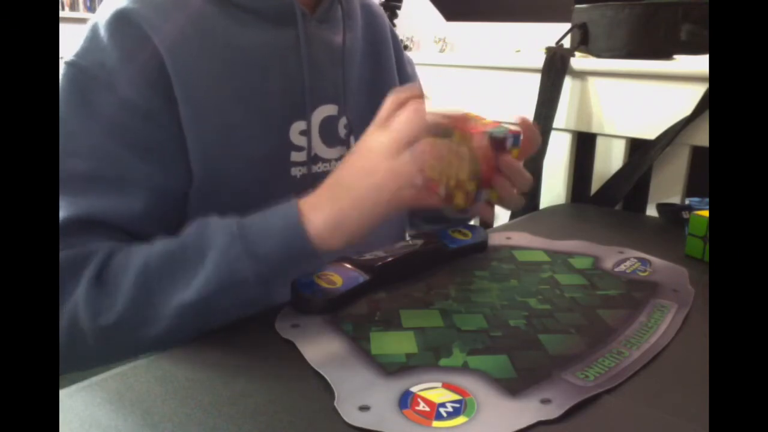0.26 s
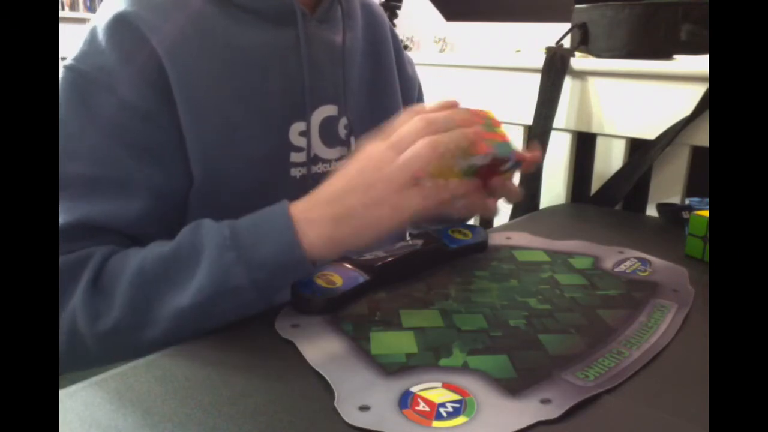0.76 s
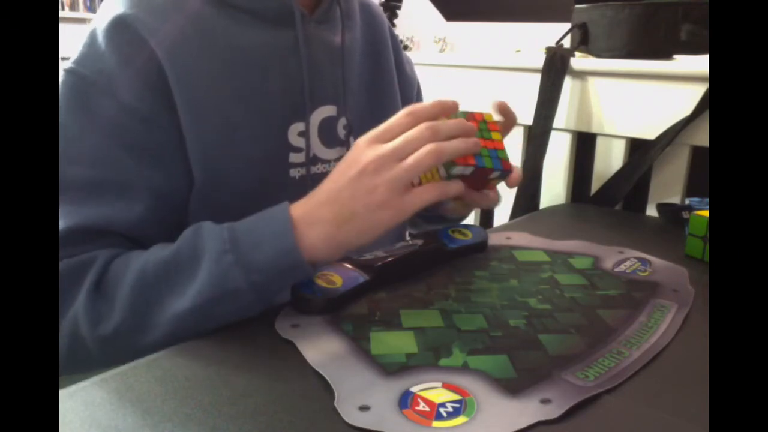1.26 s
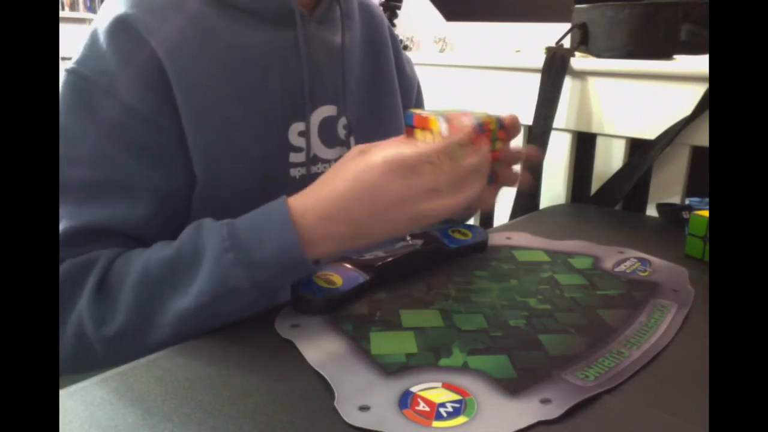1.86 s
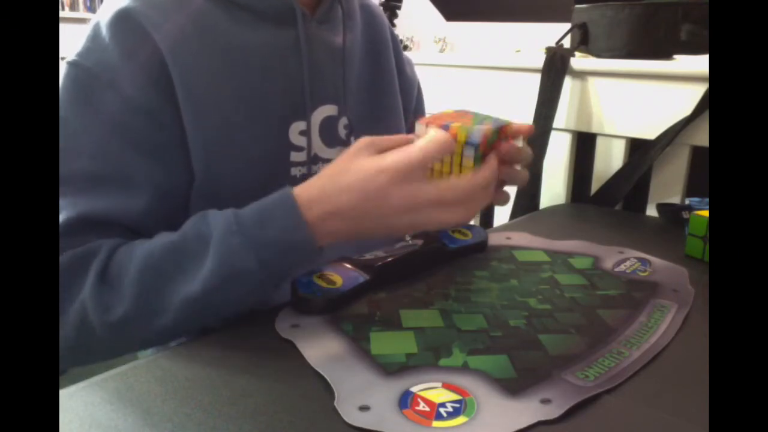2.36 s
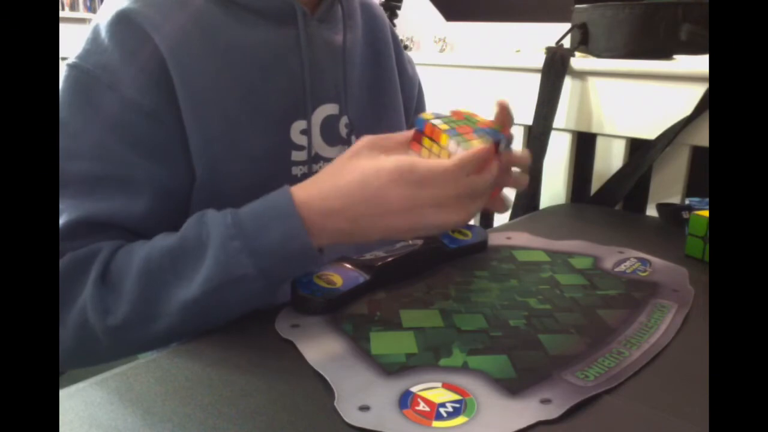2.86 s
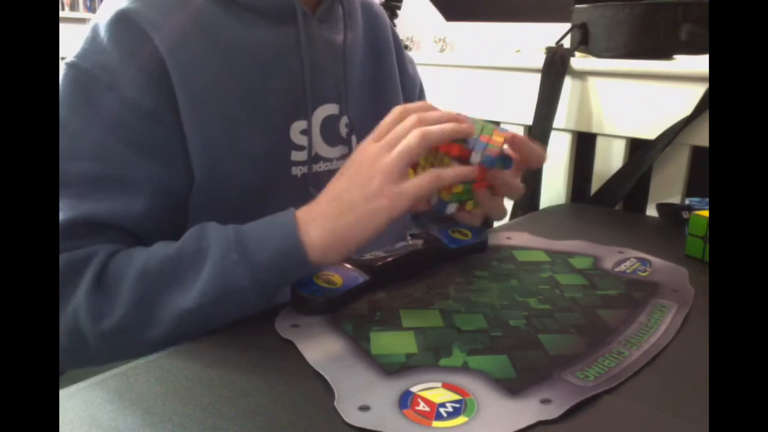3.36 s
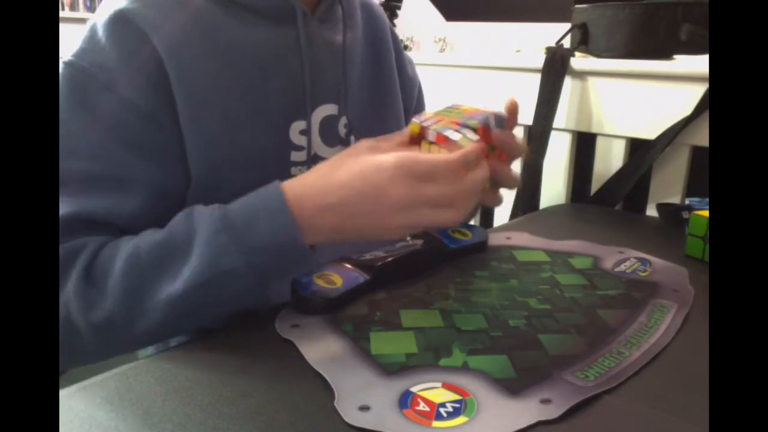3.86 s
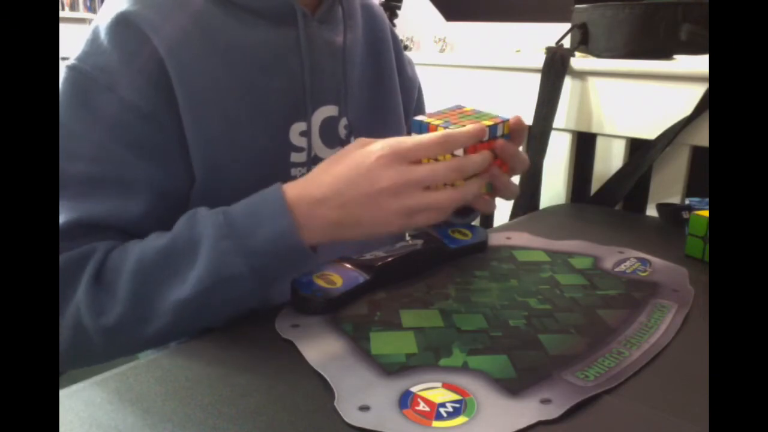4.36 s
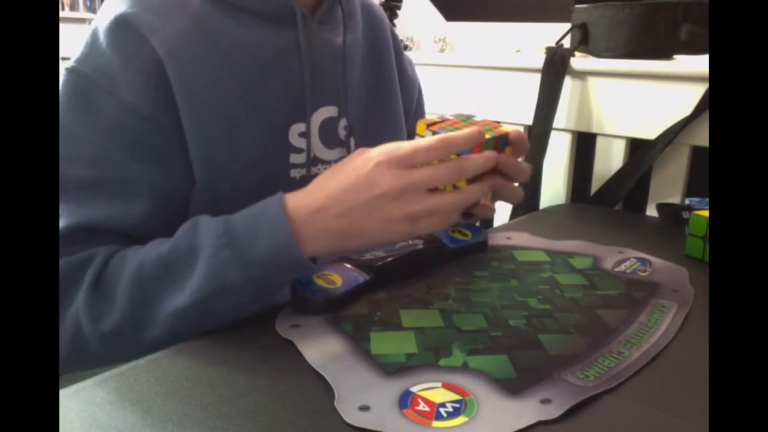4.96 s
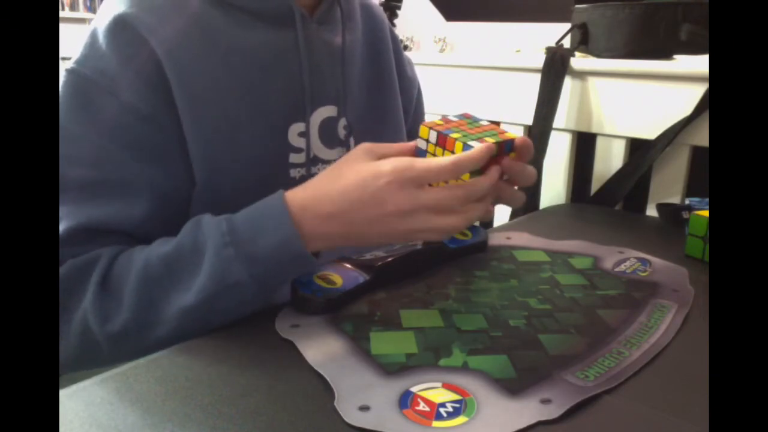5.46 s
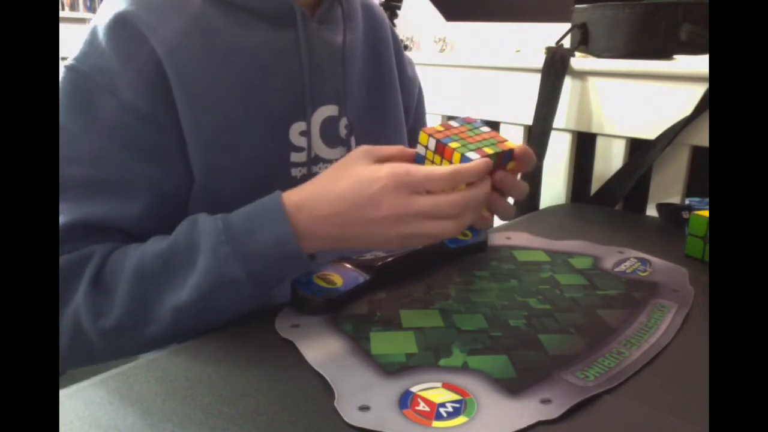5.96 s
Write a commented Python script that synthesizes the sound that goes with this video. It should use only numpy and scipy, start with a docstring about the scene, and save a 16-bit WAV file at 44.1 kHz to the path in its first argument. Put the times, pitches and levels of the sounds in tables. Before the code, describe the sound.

Close in a small quiet room, a plastic puzzle cube is turned very fast. A loud clattering burst of snaps opens, then a soft sleeve drag and a pause. A brief burst follows, then dense clusters of clicks with dull desk bumps and a small hollow knock. One last burst gives way to faint finger ticks and room noise.

```python
"""A plastic puzzle cube is turned fast by hand at a desk in a small quiet room, for about six seconds.
It opens with a strong burst of snaps over a rattle of small contacts, then an arm drags over the mat.
A short burst comes at 1.3 s and denser ones from 2.1 to 4 s, with bumps on the desk; at 3.8 s a hollow
thing is knocked and rocks. A last burst at 4.7 s and faint finger shifts leave room noise and mains hum.
Contacts are tiny noise flurries sent through damped modes; the desk and walls throw the sound back."""
import sys
import numpy as np
from scipy import signal
from scipy.fft import rfft, irfft
from scipy.io import wavfile
from scipy.ndimage import uniform_filter1d

SR = 44100
rng = np.random.default_rng(int(sys.argv[2]) if len(sys.argv) > 2 else 0)


def persist_wave(psi):
    """Save psi, clipped to +-1, as 16-bit WAV."""
    counts = np.round(np.clip(psi, -1, 1) * 32767).astype(np.int16)
    wavfile.write(sys.argv[1], SR, np.atleast_2d(counts).T)


N = 274302
HZ = np.fft.rfftfreq(2048, 1 / SR)  # the frequencies of every 2048-sample spectrum

# Damped modes of the cube's hollow body. Each row: pitch in Hz, width in Hz, relative level in dB.
BODY_MODES = [(630, 270, 2), (816, 490, 3), (1104, 350, -0.5), (1420, 540, -1.5), (1843, 910, 0.5)]
# The microphone's treble colour, put on the sharp edges. Each row: frequency in Hz, gain in dB.
MIC_COLOUR = [(6500, 3), (8200, -7.5), (9600, 2.5), (11200, 0.5), (12500, -9.5), (13900, 0), (15500, -11.5)]
# Turns of a layer. Each row: start of full force in seconds, time held in seconds, rattle level in dB,
# hollow body against it in dB, sharp edge against it in dB.
LAYER_TURNS = [(.04, .055, -28.5, -10, -4), (0.121, 0.052, -19.5, -9.5, -7.5), (1.298, 0.094, -36, -14, -6),
               (2.127, 0.012, -36.5, -22, -10.5), (2.145, 0.022, -28, -25.5, -9),
               (2.246, 0.056, -33, -8.5, -3), (2.388, 0.023, -30, -14, -7), (2.71, 0.016, -42, -13.5, -10),
               (2.738, 0.027, -23.5, -27, -4), (2.815, .03, -41.5, -8.5, -14),
               (2.864, 0.024, -30.5, -28, -2), (2.895, 0.017, -22, -11, -3),
               (3.232, 0.018, -34.5, -5.5, -6), (3.389, .025, -37.5, -16, -12),
               (3.526, .015, -42, -13, -17.5), (3.545, .03, -29.5, -15.5, -7.5),
               (3.7, 0.023, -41.5, -17, -13), (3.795, 0.012, -30, -32, -3),
               (3.875, 0.0068, -29.5, -17.5, -5.5), (3.893, 0.015, -24.5, -16, -0.5),
               (3.965, 0.012, -26.5, -9.5, -8.5), (4.662, 0.051, -33, -8.5, -7)]
TURN_RISE_DB_PER_S, TURN_FALL_DB_PER_S = 1500.5, 401.5


def gain_of(db):
    """Turns decibels into a factor."""
    return 10 ** (np.asarray(db) / 20)


def evened(x):
    """Scales a sound to rms 1."""
    return x / np.sqrt(np.mean(x ** 2) + 1e-20)


def read(points, hz):
    """Reads a curve of (Hz, value) points on a log-frequency axis."""
    f, value = np.transpose(points)
    return np.interp(np.log(hz + 1), np.log(f + 1), value)


def add(mix, s, sound):
    """Mixes a sound in at a time in seconds."""
    part = mix[round(s * SR):][:len(sound)]
    part += sound[:len(part)]


def swell(t, start, hold, db, rise, fall):
    """Level in dB that climbs, holds and sinks at steady rates (dB per s)."""
    before = np.maximum(start - t, 0)
    after = np.maximum(t - start - hold, 0)
    return db - rise * before - fall * after


def mode(hz, width):
    """Spectrum of one damped mode, gain 1 at its centre; a wider mode dies sooner."""
    return 1j * HZ * width / (hz ** 2 - HZ ** 2 + 1j * HZ * width)


def modes(table, lowest_hz=500):
    """Spectrum of a set of modes; a small body sends out little below its lowest mode."""
    small = (1j * HZ / lowest_hz / (1 + 1j * HZ / lowest_hz)) ** 4
    return small * sum(gain_of(db) * mode(hz, width) ** 2 for hz, width, db in table)


def nearby(count):
    """Rows of spectra: the direct sound plus echoes off hands, desk and chest, drawn anew for each row."""
    # Each row: shortest delay in seconds, longest delay in seconds, echo level in dB.
    near_echoes = [(.0006, .0015, -8), (.0016, .0028, -11), (.003, .005, -16), (.005, .008, -21)]
    short, long, db = np.array(near_echoes).T
    delay = short + (long - short) * rng.random((count, len(db)))
    echoes = gain_of(db)[:, None] * np.exp(-2j * np.pi * HZ * delay[..., None])
    return 1 + echoes.sum(axis=1)


def chatter(count, rise, t60):
    """A contact is a quick flurry of tiny blows, heard with its near echoes (rows of spectra)."""
    t = np.arange(500) / SR
    envelope = (1 - np.exp(-t / rise)) ** 2 * gain_of(-60 * t / t60)
    flurry = rng.standard_normal((count, len(t))) * envelope
    return rfft(flurry, 2048) * nearby(count)


def strike(colour, blows):
    """Sends rows of contact spectra through a colour; rms 1 over the first 2.5 ms."""
    sound = irfft(blows * colour)[:, :1200]
    return sound / np.sqrt(np.mean(sound[:, :110] ** 2, axis=1, keepdims=True))


def clicks(rows, edge_width_hz=4400):
    """Each snap sounds the piece, the hollow body and the sharp edge in its own shares."""
    s, db, body_db, edge_db, hz = np.array(rows).T[..., None]
    # the body and edge shares set how wide the piece's modes spread (Hz, then Hz per dB of each share)
    spread = np.maximum(2900 + 39 * body_db + 53 * edge_db, 500)
    # the edge has one pitch, a little off at each snap
    edge_hz = 10730 * np.exp(0.045 * rng.standard_normal(s.shape))
    blows = chatter(count=len(s), rise=.0003, t60=.0034)

    neighbours = gain_of(-24.0) * mode(2000, 1200) ** 2
    piece = strike(mode(hz, 1.5 * spread) ** 3 + neighbours, blows)
    body = strike(modes(BODY_MODES), blows)
    edge = strike(mode(edge_hz, edge_width_hz) ** 3 * gain_of(read(MIC_COLOUR, HZ)), blows)
    sound = piece + gain_of(body_db) * body + gain_of(edge_db) * edge

    out = np.zeros(N)
    for at, one in zip(s[:, 0], gain_of(db) * sound):
        add(out, at, one)
    return out


def small_ticks(pitch_off=0.08, share_off_db=5.0):
    """Rows like the snaps, drawn by chance: ten follow the force of each turn, nine fall in each regrip."""
    # Fingers regrip and the pieces shift faintly. Each row: start in seconds, length in seconds, level in dB.
    finger_shifts = [(2.517, .18, -55.5), (2.992, 0.17, -55.5), (3.101, 0.1, -51.5), (3.308, 0.067, -62),
                     (4.759, .16, -60), (5.071, 0.066, -63.5)]
    tick_db, tick_spread_db, lead_s, trail_s = -1.4, 3, .008, .05
    loose_body_db, loose_edge_db, loose_hz, regrip_dull_db = -9, -8, 3900, -8

    start, hold, db = np.array(LAYER_TURNS).T[:3, :, None]
    t = start - lead_s + (lead_s + hold + trail_s) * rng.random((len(LAYER_TURNS), 10))
    level = swell(t, start, hold, db + tick_db, TURN_RISE_DB_PER_S, TURN_FALL_DB_PER_S)

    start, length, db = np.array(finger_shifts).T[..., None]
    shift = start + length * rng.random((len(finger_shifts), 9))
    edge_db = loose_edge_db + np.append(0 * t, regrip_dull_db + 0 * shift)  # regrips are duller

    t, level = np.append(t, shift), np.append(level, db + 0 * shift)
    a, b, c, d = rng.standard_normal((len(t), 4)).T
    return np.transpose([np.maximum(t, 0),
                         level + tick_spread_db * a,
                         loose_body_db + share_off_db * b,
                         edge_db + share_off_db * c,
                         loose_hz * np.exp(pitch_off * d)])


def rattle(per_s=1200, spread_db=3.5, pitch_hz=3700, width_hz=3200, edge_hz=10500, edge_width_hz=6000,
           detune=0.37):
    """Many small contacts of uneven size on two dozen pieces, under the force of the turn."""
    t = np.arange(N) / SR
    force = np.zeros((3, N))  # for the pieces, the body and the edges
    for start, hold, db, body_db, edge_db in LAYER_TURNS:
        level = gain_of(swell(t, start, hold, db, TURN_RISE_DB_PER_S, TURN_FALL_DB_PER_S))
        force = np.maximum(force, level * gain_of([[0], [body_db], [edge_db]]))

    size = gain_of(spread_db * np.minimum(rng.exponential(1, N), 4))
    size = size * (rng.random(N) < per_s / SR)  # contacts fall at random moments
    piece = rng.integers(0, 24, N)
    blows = chatter(count=24, rise=.0002, t60=.002)
    pitch = pitch_hz * np.exp(detune * rng.standard_normal((24, 1)))
    edge = mode(edge_hz * np.sqrt(pitch / pitch_hz), edge_width_hz) ** 2 * gain_of(read(MIC_COLOUR, HZ))

    out = np.zeros(N)
    for colour, level in zip((mode(pitch, width_hz) ** 2, modes(BODY_MODES), edge), force):
        hits = np.zeros(N)
        for k, one in enumerate(strike(colour, blows)):
            hits += signal.oaconvolve(size * (piece == k), one)[:N]
        out += uniform_filter1d(level, size=130) * evened(hits)
    return out


def thumps():
    """A palm or wrist bumps the desk: a low dull push, a fading sine with a soft start."""
    # Each row: start in seconds, level in dB before the soft start, pitch in Hz, time to fade 60 dB in seconds.
    desk_bumps = [(0.144, -36.5, 380, 0.084), (2.747, -38, 264, 0.063), (3.566, -38, 268, 0.045),
                  (3.8276, -21.5, 199, 0.016)]
    out, t = np.zeros(N), np.arange(6000) / SR
    for s, db, hz, t60 in desk_bumps:
        soft_start = (1 - np.exp(-t / .002)) ** 2
        add(out, s, gain_of(db - 60 * t / t60) * soft_start * np.sin(2 * np.pi * hz * t))
    return out


def nudges():
    """A hollow thing on the desk is knocked, then rocks to rest, ringing the same modes at each nudge."""
    # Each row: pitch in Hz, relative level in dB, time to fade 60 dB in seconds.
    hollow_modes = [(650, 0, .09), (790, 0, .09), (890, -4, .07), (1740, -4, .05), (2170, -4, .045),
                    (2235, 0, .07), (2310, -4, .045)]
    knock, rock = (3.826, -56, -35), (3.92, -41, -43)  # start in s, low modes in dB, high modes in dB
    gap_s, steady_s, low_fall_db_per_s, high_fall_db_per_s = .0175, .13, 200, 55

    out, t = np.zeros(N), np.arange(6000) / SR
    hz, db, t60 = np.array(hollow_modes).T[..., None]
    late = gap_s * (np.arange(11) + rng.uniform(-.2, .2, 11))  # uneven rocking
    rocks = np.transpose([rock[0] + late,
                          swell(late, 0, steady_s, rock[1], 0, low_fall_db_per_s),
                          rock[2] - high_fall_db_per_s * late])
    soft_start = 1 - np.exp(-t / 0.00065)
    for (s, low_db, high_db), (phase, off) in zip([knock, *rocks], rng.random((12, 2, len(hz), 1))):
        level = gain_of(np.where(hz < 1200, low_db, high_db) + db - 60 * t / t60)
        pitch = hz * (1 + 0.027 * (off - .5))  # a little off at each nudge
        ringing = level * np.sin(2 * np.pi * pitch * t + phase)
        add(out, s, ringing.sum(axis=0) * soft_start)
    return out


def drag(per_s=400):
    """A forearm drags lightly over the desk mat: cloth catches and slips in small uneven jerks."""
    # Each row: start in seconds, time held in seconds, level in dB.
    arm_drags = [(.33, .01, -55.5), (.56, .25, -67), (1.55, 0.052, -72), (4.12, 0.065, -61.5)]
    # What the drag sounds through. Each row: pitch in Hz, width in Hz, relative level in dB.
    mat_modes = [(584, 130, 1), (840, 110, 0.5), (1660, 140, -8.5), (2270, 220, -7.5)]
    rise_db_per_s, fall_db_per_s = 300, 166

    slips = rng.standard_normal(N) * rng.exponential(1, N) * (rng.random(N) < per_s / SR)
    t = np.arange(N) / SR
    level = sum(gain_of(swell(t, *row, rise_db_per_s, fall_db_per_s)) for row in arm_drags)
    return level * evened(signal.oaconvolve(slips, irfft(modes(mat_modes)))[:N])


def room(x):
    """The walls answer after a gap with a noise tail, each band dying at its own speed."""
    # Each row: frequency in Hz, time to fade 60 dB in seconds.
    wall_fades = [(300, 0.15), (800, 0.12), (2100, 0.13), (5500, 0.16), (12000, 0.11)]
    room_db, late_db, late_t60 = -13.5, -29.5, 0.4  # whole tail; start of the slow part before scaling; s

    hz, t, z = signal.stft(rng.standard_normal(SR), SR, nperseg=256)
    fade = gain_of(-60 * t / read(wall_fades, hz)[:, None])
    # the house beyond: slower and duller
    fade = fade + gain_of(late_db - 60 * t / late_t60) / (1 + (hz[:, None] / 2500) ** 2)
    tail = signal.istft(z * fade, SR, nperseg=256)[1][:SR]
    tail *= np.clip((np.arange(SR) / SR - .005) / .016, 0, 1)  # silent for 5 ms, then fades in over 16 ms
    tail *= gain_of(room_db) / np.linalg.norm(tail)
    return x + signal.fftconvolve(x, tail)[:N]


def background():
    """Room noise with soft patches in time and pitch, and hum lines that waver in level."""
    # Colour of the room noise. Each row: frequency in Hz, relative level in dB per Hz.
    air_colour = [(18, -48.5), (30, -18.5), (125, 0.5), (242, -1), (443, -9), (835, -6), (1210, -12.5),
                  (1890, -9), (2050, -12.5), (5160, -18.5), (8760, -20.5), (10300, -19), (11700, -26.5),
                  (13700, -26.5), (16500, -61.5)]
    # Each row: pitch in Hz, level in dB rms at the end of the scene.
    hum_lines = [(118.4, -76.5), (807.5, -81.5), (1922, -79.5), (2762, -89), (2880, -84), (2998, -99.5)]
    # The background rises after bursts and sinks in pauses. Each row: time in seconds, noise level in dB.
    noise_level = [(0, -54), (.3, -57), (.66, -58), (0.848, -60), (1.1, -64), (1.3, -62.5), (1.45, -56.5),
                   (1.85, -60.5), (2.15, -56.5), (2.5, -55.5), (3.0, -56), (3.6, -55.5), (4.15, -54.5),
                   (4.45, -59), (5.06, -57.5), (5.472, -63.5), (6.22, -64)]

    frames, t = N // 512 + 5, np.arange(N) / SR
    a, b, patches = rng.standard_normal((frames, 1025, 3)).T
    patches = uniform_filter1d(patches, size=20, axis=0)  # smooth in pitch
    patches = evened(uniform_filter1d(patches, size=8, axis=1))  # smooth in time
    z = (a + 1j * b) * gain_of(read(air_colour, HZ)[:, None] + 0.72 * patches)
    air = evened(signal.istft(z, nperseg=2048, noverlap=1536)[1][:N])

    s, db = np.transpose(noise_level)
    level = gain_of(np.interp(t, s, db))
    hum = np.zeros(N)
    for f, d in hum_lines:
        waver = evened(uniform_filter1d(rng.standard_normal(N), size=4000))
        hum += gain_of(d + 0.58 * waver) * np.sqrt(2) * np.sin(2 * np.pi * f * t)
    return level * (air + hum / level[-1])  # the hum follows the noise level too


def scene():
    """The cube and the desk sounds in the room, over the background."""
    # The clearest snaps. Each row: start in seconds, level of the piece in dB rms over its first 2.5 ms,
    # hollow body against it in dB, sharp edge against it in dB, pitch of the piece in Hz.
    clear_snaps = [(.0104, -37.5, -15, -12.5, 4300), (.0362, -40, -12, -1, 3780),
                   (.0458, -31, -8, 0.5, 3600), (.0539, -18, -8.5, -8, 4040), (.0646, -22, -4, -5.5, 4040),
                   (.073, -30, -6, -2, 4000), (.0824, -23, -12.5, 6.5, 4700), (.0918, -31, -21, 4, 5100),
                   (.1144, -23, -8, -7, 3230), (.1223, -17, -8, -13, 2800), (.1319, -17.5, 2.5, -1, 3470),
                   (.1387, -11.5, -11, -6, 3900), (.1515, -18.5, -11, 2.5, 4170),
                   (.1609, -16, -9, -9, 5100), (.17, -31, -10, -11.5, 3540), (.1778, -13, -1, -10, 3360),
                   (.1862, -33, -15.5, -10, 3430), (.202, -18.5, -15, -14.5, 3980),
                   (.2056, -26.5, 0.5, -8.5, 3300), (.3601, -48.5, -13, -15, 3500),
                   (.7683, -44.5, -17, -23, 3630), (1.2953, -35, -23, -4, 4100),
                   (1.3072, -35, -13, 1, 4570), (1.3117, -29.5, -22.5, -2, 3600),
                   (1.3274, -28, -16, -14.5, 3700), (1.3548, -31, -18, -3, 4400),
                   (1.3672, -35, -8, -2, 3800), (1.376, -27.5, -1, -16, 3300),
                   (1.3927, -24.5, -10, -8.5, 3200), (1.8185, -47.5, -10, -2, 3420),
                   (1.8338, -37, -19, -18, 4040), (1.9504, -27.5, -37, -1, 3440),
                   (2.0604, -40.5, -8, -17, 4180), (2.1136, -46, -3, -18, 3980),
                   (2.1247, -26.5, -26, -12, 3660), (2.1466, -20, -12, -6.5, 4000),
                   (2.1524, -27, -19, -10, 4160), (2.1568, -24.5, -11, 3, 4660),
                   (2.1663, -19, -11.5, -7, 4460), (2.1775, -33, -37, -1, 4100),
                   (2.191, -27, -12, -3, 3400), (2.2001, -29, -17, -3, 4100), (2.2176, -39, -17, -2, 4300),
                   (2.2409, -35, -8, -1, 4300), (2.2533, -23, -15, -0.5, 4350),
                   (2.2766, -24.5, 3.5, -7, 3200), (2.3006, -37, -17, -20, 4240),
                   (2.343, -31.5, -8, -3, 3900), (2.3833, -25.5, -15, -5.5, 3470),
                   (2.3889, -28, -15, -13, 3320), (2.3959, -24, -1.5, 2.5, 4100),
                   (2.4036, -24, -1.5, -3, 3100), (2.4129, -30, -16, 7, 4200),
                   (2.5637, -44.5, -4, -16, 3200), (2.5756, -32.5, -21, -21, 3930),
                   (2.7085, -32.5, -24, -16, 3440), (2.7155, -40, -17, -5, 3600),
                   (2.7329, -39, -11, 2, 3300), (2.7405, -26, -21, 0, 3700),
                   (2.7479, -16.5, -12.5, -6.5, 3640), (2.7589, -20, -1.5, 0.5, 3760),
                   (2.7783, -25, -9, -10, 3770), (2.8129, -37, -19, 11, 5500), (2.8188, -37, -10, 3, 3900),
                   (2.8333, -34, -20, -13, 3230), (2.8621, -37, -10.5, 4.5, 4580),
                   (2.875, -31, -18, 4, 4400), (2.8809, -33.5, -11, 3.5, 4400),
                   (2.8925, -26, -14, -4, 4300), (2.9021, -23, -7, -4.5, 3070), (2.9107, -31, -14, 3, 4150),
                   (2.9227, -26, -9.5, -8, 3900), (2.927, -28.5, -10, -3, 3700),
                   (2.9373, -20, -8, -11, 3900), (3.1996, -41.5, -25, -12, 3600),
                   (3.2314, -34, -13, -4, 3900), (3.2346, -28.5, -9, -6, 3750),
                   (3.2482, -27.5, -2.5, -6, 3040), (3.2912, -32, -26, -6.5, 3900),
                   (3.3757, -40, -11, -29, 3700), (3.3856, -35, -5, -13, 3970),
                   (3.4077, -28.5, -4.5, -15, 4130), (3.4207, -26, -18, 3.5, 4660),
                   (3.429, -30.5, -24, -2, 4300), (3.5221, -32.5, -8, -17, 4000),
                   (3.542, -29, -2, -9.5, 4400), (3.5521, -20.5, -11, -7, 3580),
                   (3.5665, -17.5, -1, -13, 3400), (3.5779, -22.5, -15, -3, 4100),
                   (3.5914, -29.5, 0, -3, 3370), (3.6932, -29, -8.5, -22, 3760),
                   (3.7146, -23.5, -13, -5.5, 4300), (3.7602, -35, -26, -9, 4400),
                   (3.7706, -40.5, -26, 5, 4300), (3.7904, -24, -9, -8, 4040), (3.796, -26, -30, 2, 6060),
                   (3.8043, -31, -22, -3, 4230), (3.8187, -32, -7, 3, 3900), (3.8263, -26, -5.5, -33, 2350),
                   (3.8752, -34.5, -23, -3, 3230), (3.8951, -18, -4.5, -6, 4700),
                   (3.9053, -23, -19, -17, 3500), (3.9186, -17, -11, -8.5, 3200),
                   (3.933, -23, -5, -1, 3600), (3.9438, -27, -10.5, -5, 4100), (3.9592, -28, -2, -9, 3500),
                   (3.9659, -32, 2, -8, 3800), (3.9712, -22.5, -16, -2, 3470), (4.0004, -34, 0, -12, 3900),
                   (4.0064, -40, -16, -9, 4300), (4.0201, -35.5, 5, -27, 3250),
                   (4.1411, -35.5, -17, -12, 3700), (4.1447, -24.5, -17, -2.5, 4700),
                   (4.476, -55, -6, -10.5, 3570), (4.5669, -40.5, -31, -31, 3280),
                   (4.6432, -40.5, -21, -25, 4200), (4.6611, -28, -22, -26, 4760),
                   (4.664, -29, -26, -17, 4400), (4.6735, -25.5, -21, -15, 3450),
                   (4.6802, -19.5, -23.5, -10, 3680), (4.6914, -17.5, -8, -16, 3700),
                   (4.7044, -20.5, -8.5, -10.5, 3030), (4.7194, -24.5, -23, -10, 3900),
                   (4.7352, -36, -15, -2, 4000), (4.7403, -40, 2, -1, 3820),
                   (4.8094, -25.5, -9.5, -1, 3586), (5.1243, -41.5, -6, 3.5, 3140)]
    cube = clicks(clear_snaps) + clicks(small_ticks()) + rattle()
    desk = thumps() + nudges() + drag()
    return (room(cube + desk) + background())[None]


def record(dry):
    """The loudest snaps meet a soft ceiling, deep bass is cut, then the top of the treble."""
    held = 1.3 * np.tanh(dry / 1.3)
    held = signal.sosfilt(signal.butter(2, 45, "high", fs=SR, output="sos"), held)
    band_limit = signal.firwin(511, 15850, window=("kaiser", 9), fs=SR)  # low-pass, edge in Hz
    return signal.oaconvolve(held, band_limit[None], "same")


dry = scene()
out = record(dry)
persist_wave(out)
```